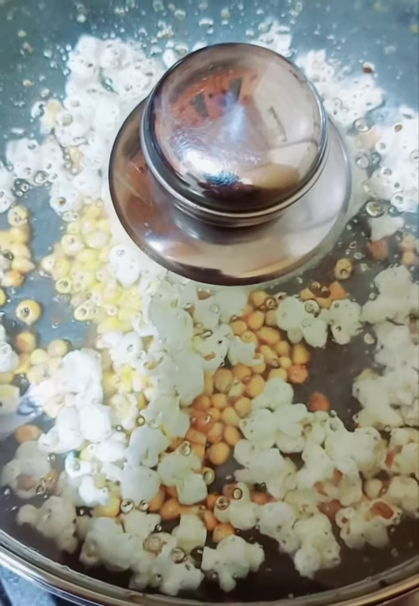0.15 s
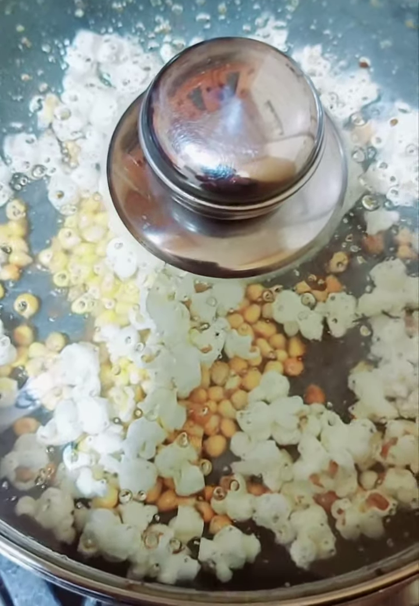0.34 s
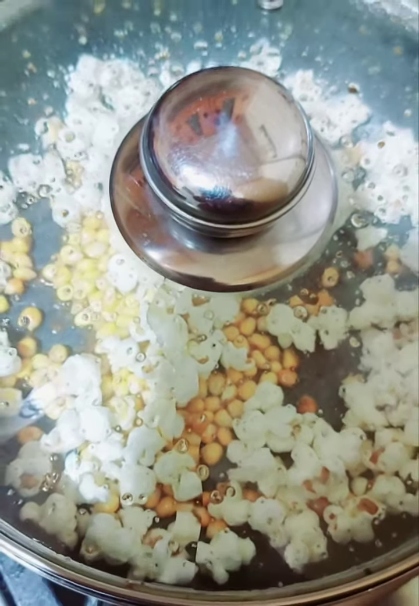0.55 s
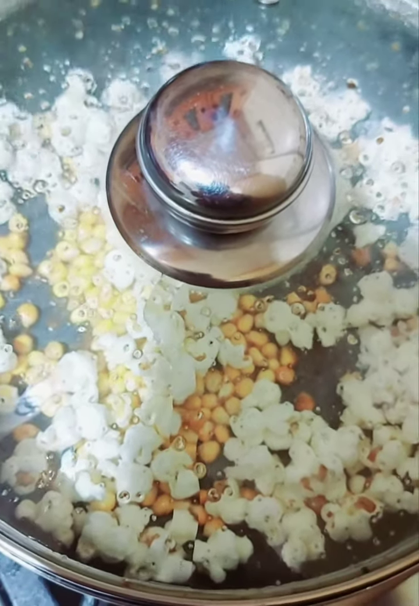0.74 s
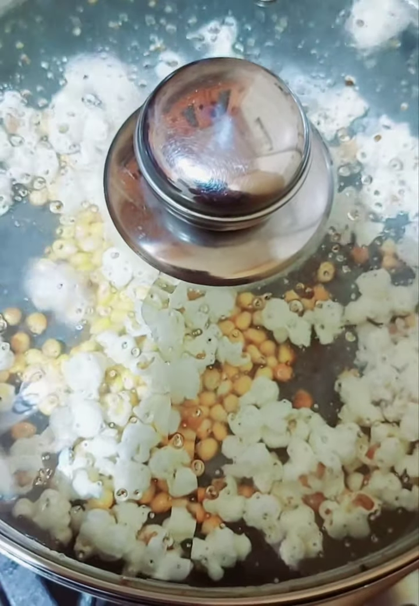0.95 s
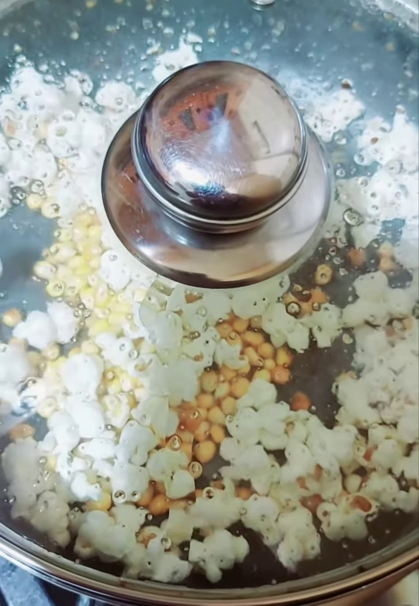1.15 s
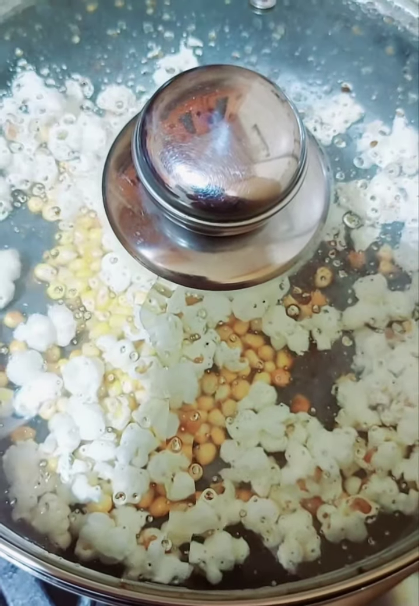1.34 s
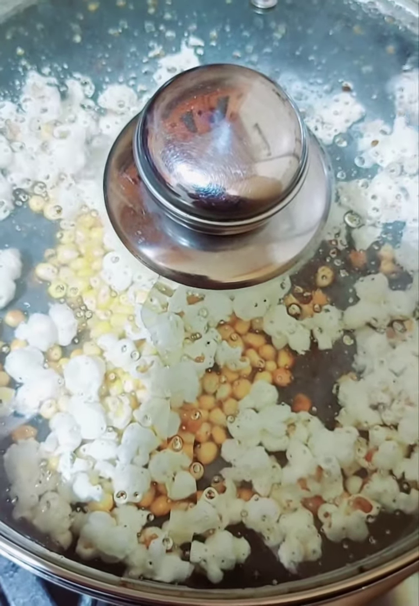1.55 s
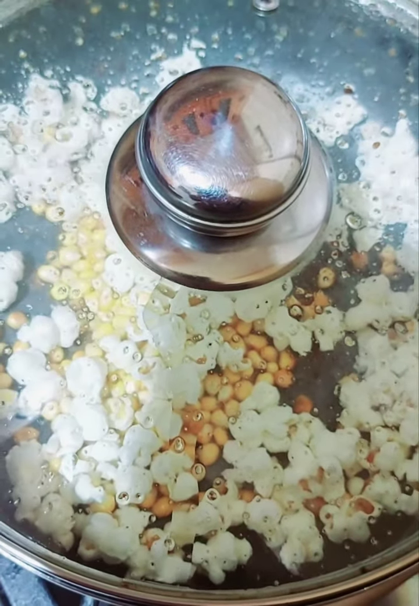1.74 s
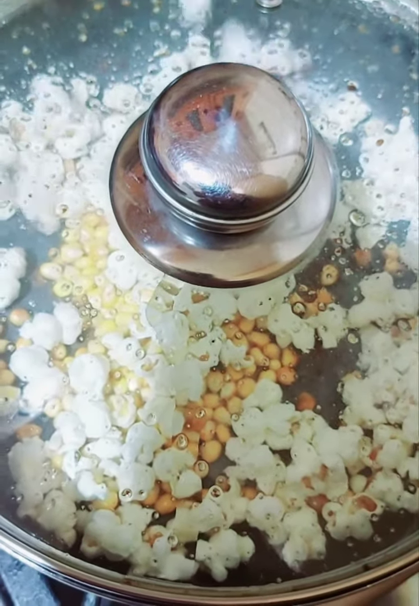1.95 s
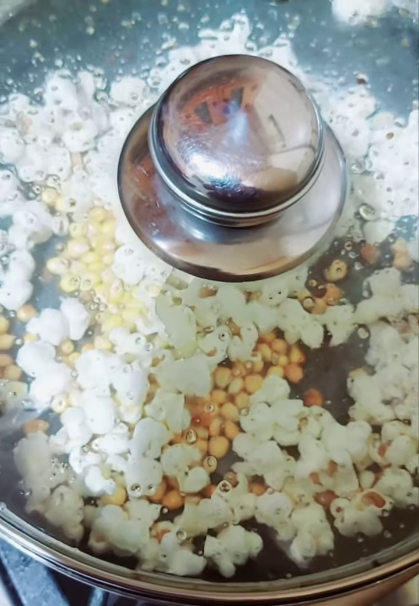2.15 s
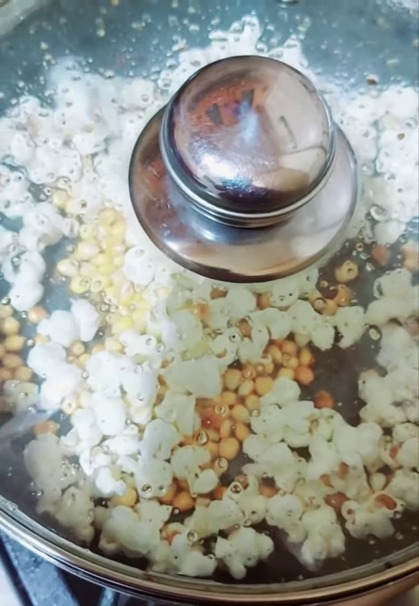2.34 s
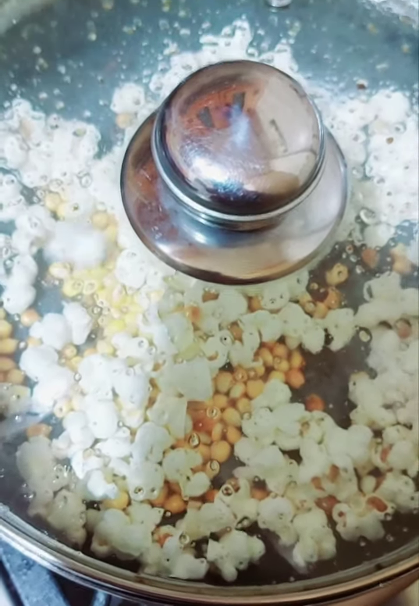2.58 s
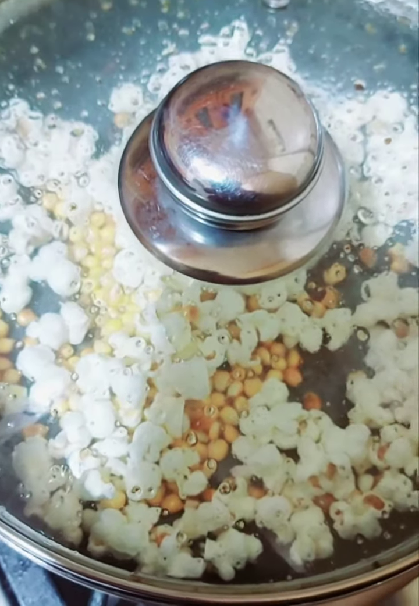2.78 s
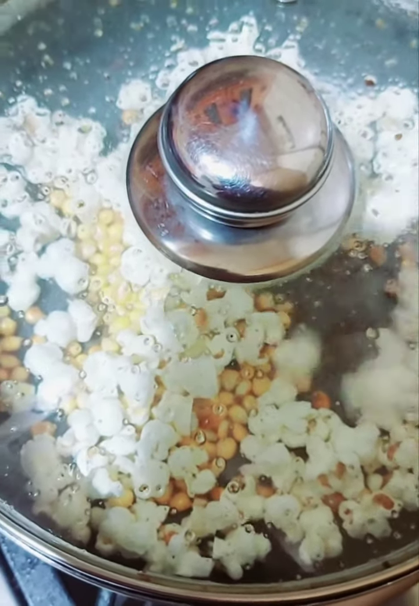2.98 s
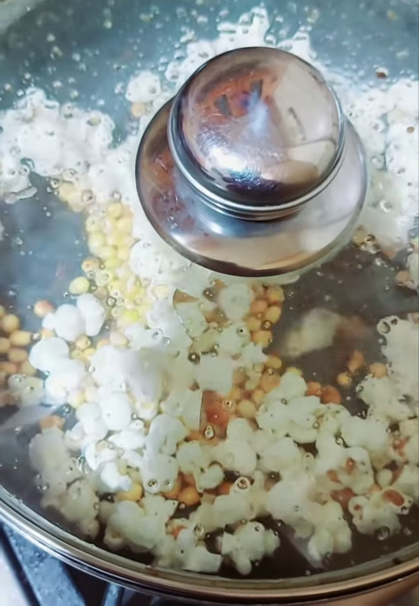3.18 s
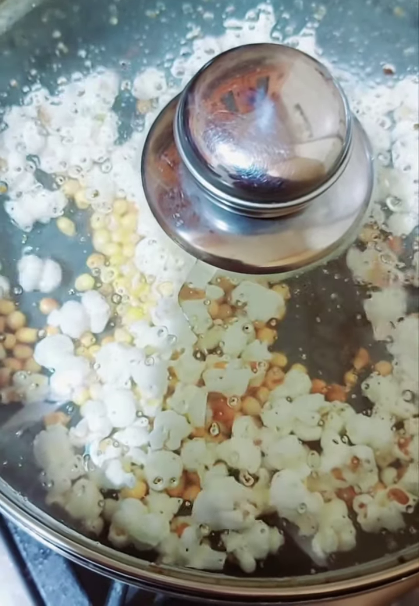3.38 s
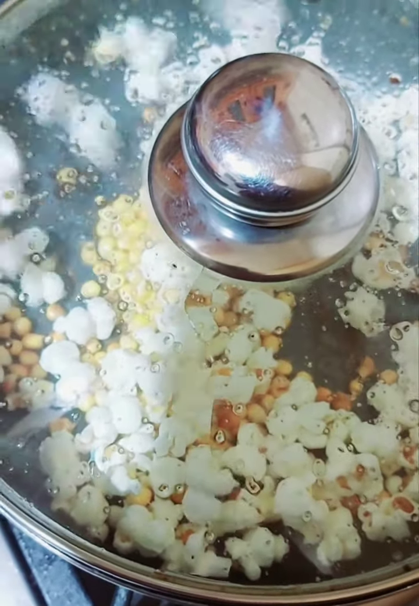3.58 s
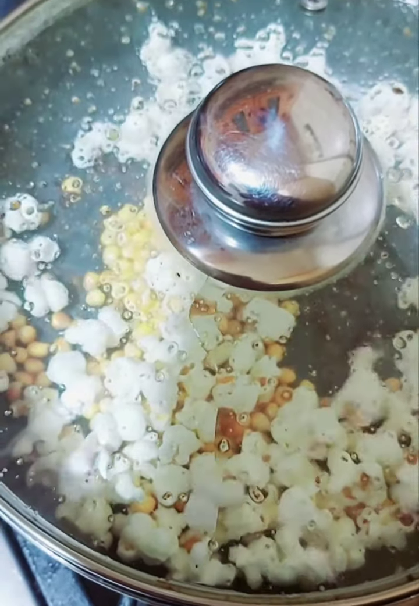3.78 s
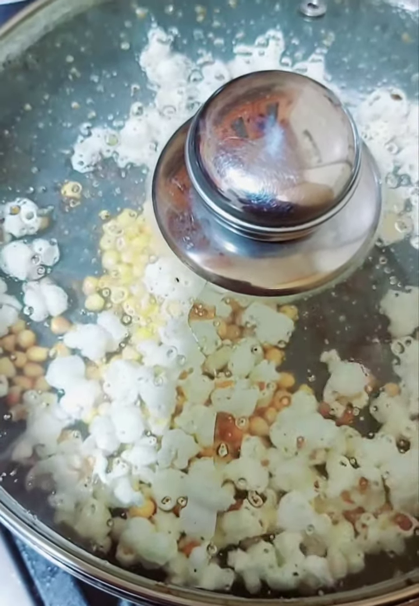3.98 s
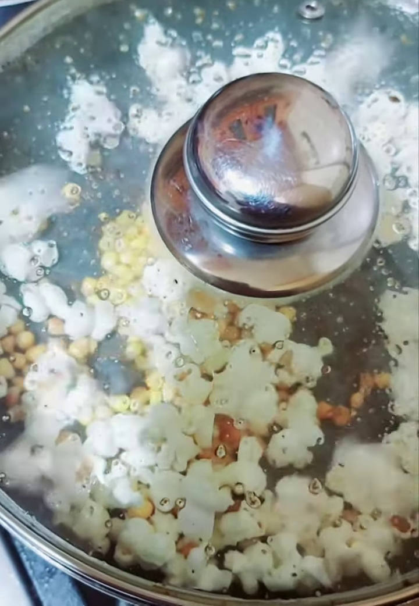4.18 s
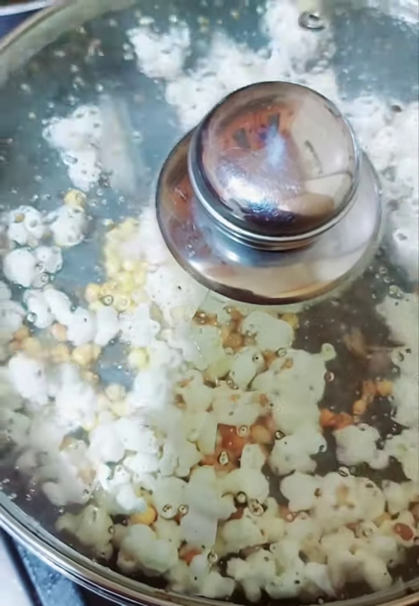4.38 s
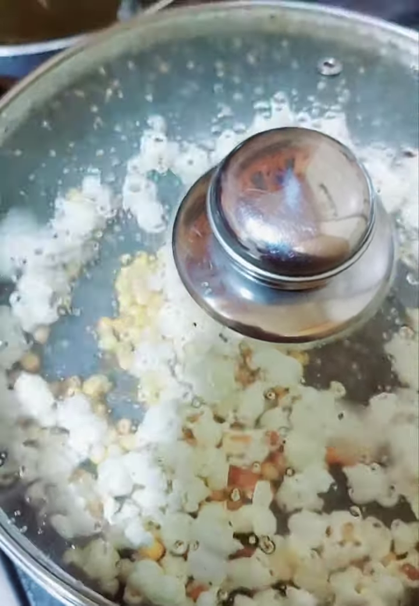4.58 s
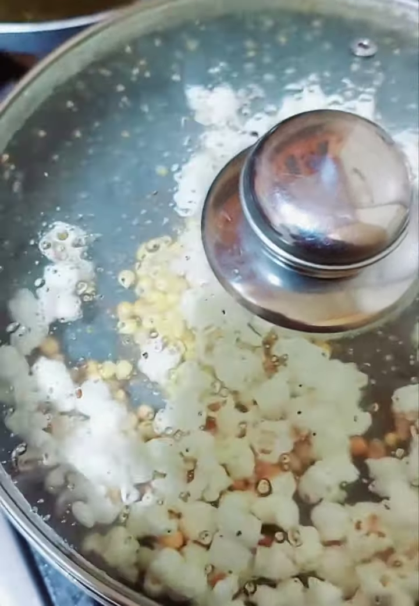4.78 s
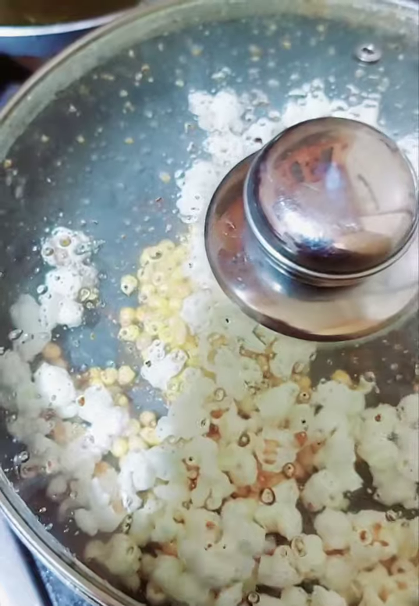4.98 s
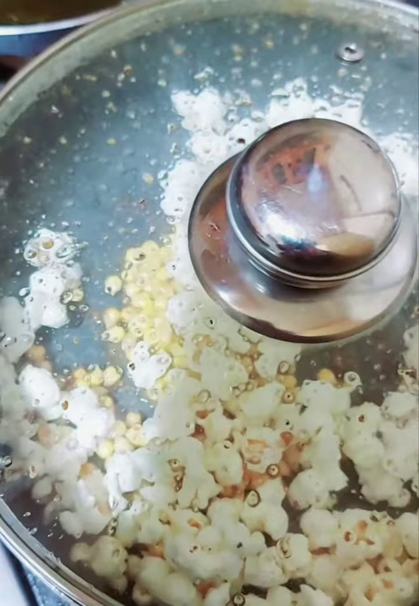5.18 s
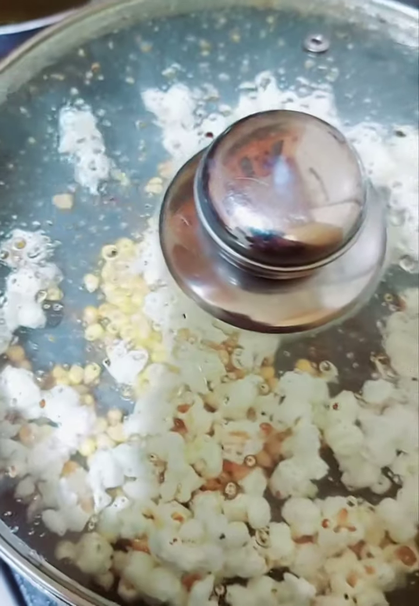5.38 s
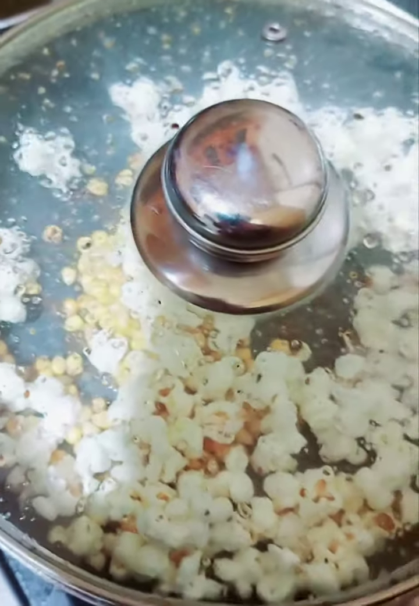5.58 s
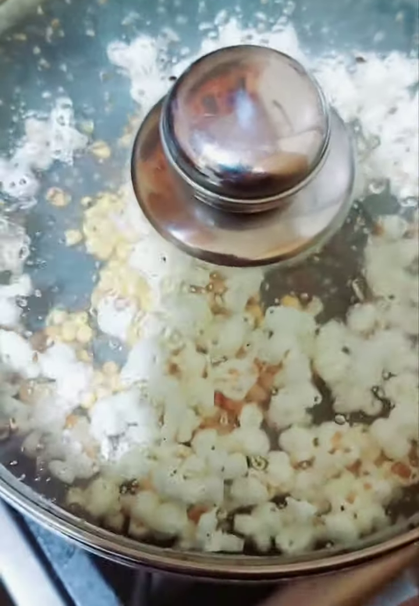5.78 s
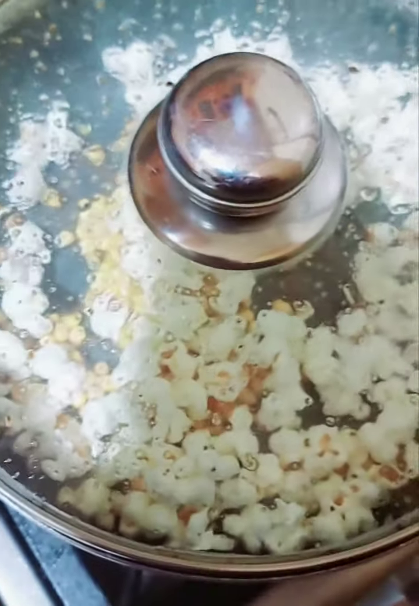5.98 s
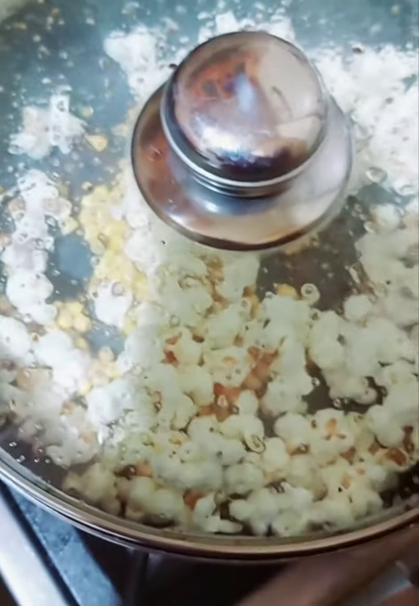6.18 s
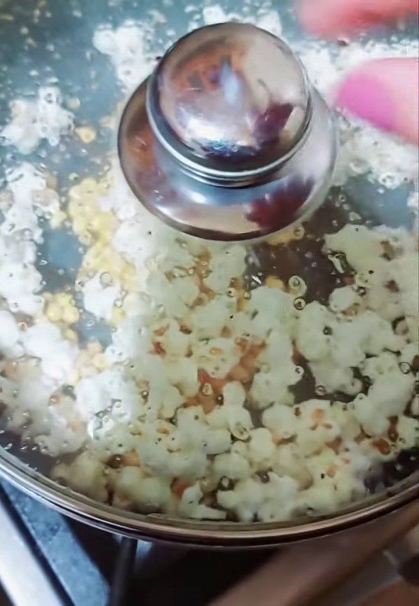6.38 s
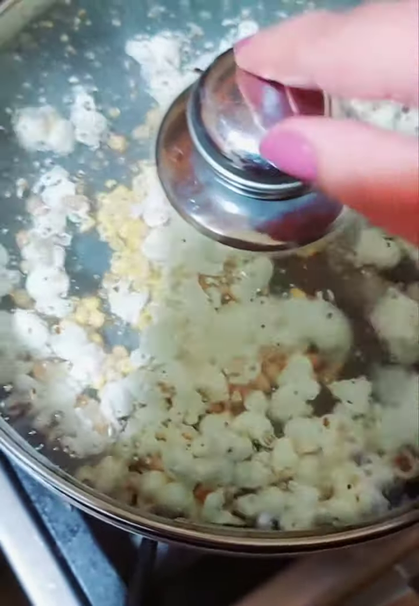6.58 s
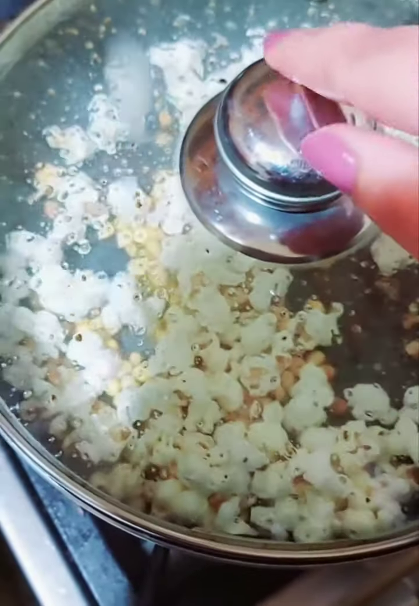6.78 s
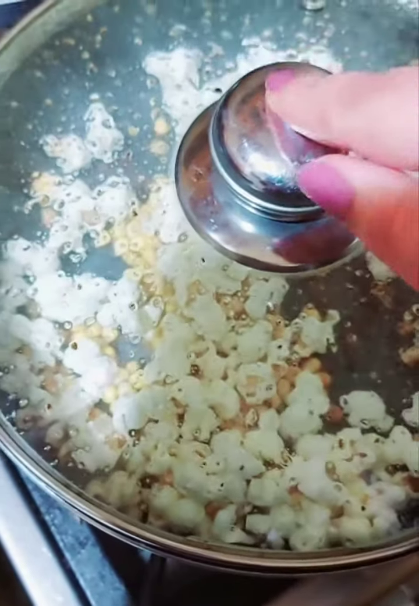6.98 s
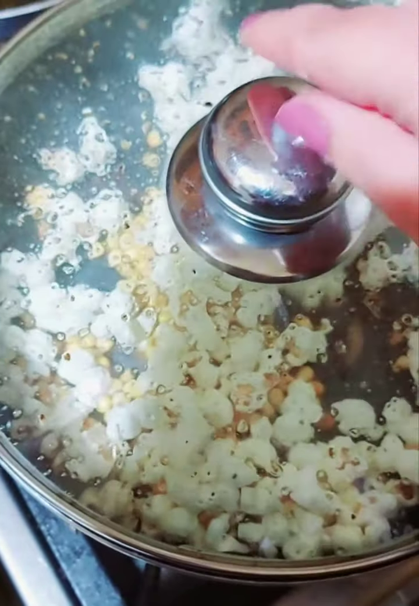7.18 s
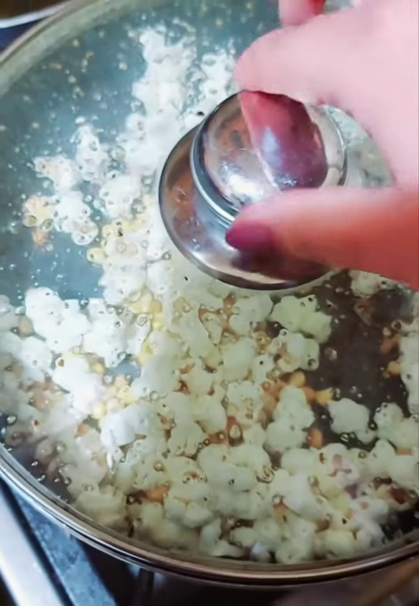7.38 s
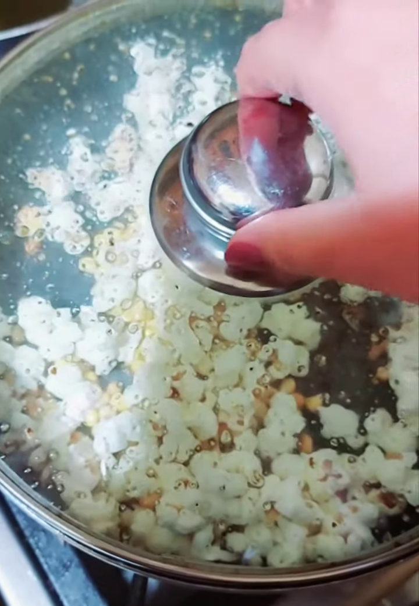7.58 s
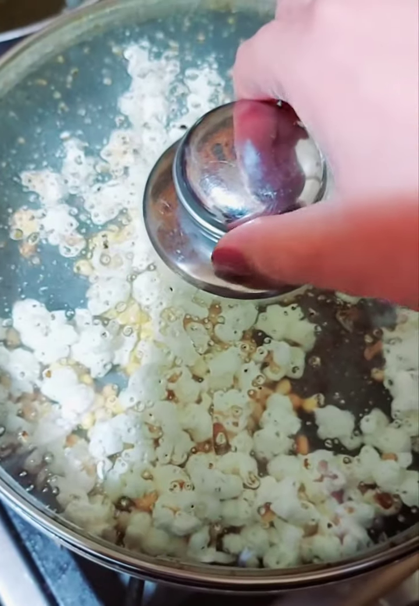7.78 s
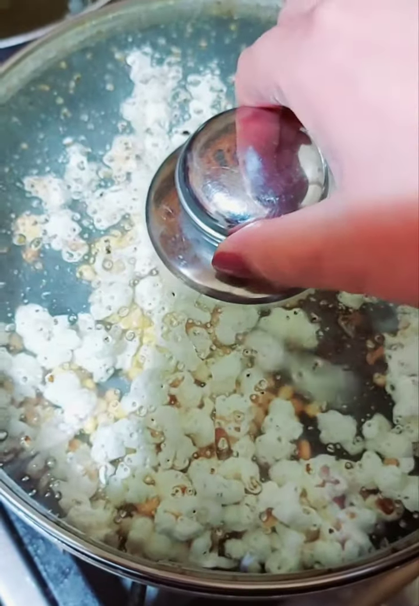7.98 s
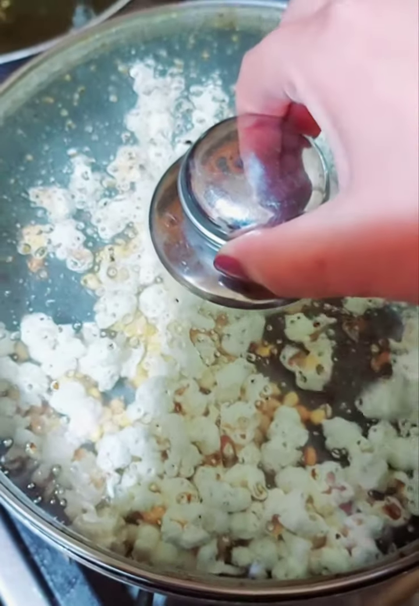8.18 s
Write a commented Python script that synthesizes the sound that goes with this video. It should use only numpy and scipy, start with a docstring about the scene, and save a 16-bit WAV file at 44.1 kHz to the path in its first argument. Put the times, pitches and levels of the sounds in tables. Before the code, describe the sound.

Heard close above a glass-lidded pan on a stove: fine oil sizzle and spitting ticks first, then popcorn kernels bursting in irregular clusters. Sharp dry cracks come with hollow low thumps, brief glass rattle and steam hiss. Flakes land with dull knocks. Popping is densest just past the middle, then thins, with two strong late pops and one final crack. Close, dry stereo.

```python
"""Popcorn kernels burst in a pan under a glass lid, heard from close above the lid by a pair of microphones.
Each burst is a noise crack, a thump and push on struck pan modes, a ring and rattle of the glass and a
noise hiss of steam. Soft flakes land with dull knocks, and hot oil spits short ticks of filtered noise.
Behind them lies a crackling noise sizzle over a low murmur; this background rises in level with each
burst, then sinks."""
import sys
import numpy as np
from scipy import signal
from scipy.fft import rfft, irfft
from scipy.io import wavfile

SR = 44100
rng = np.random.default_rng(int(sys.argv[2]) if len(sys.argv) > 2 else 0)


def store_wav(level_fs):
    """Save 16-bit WAV to argv[1]."""
    pcm = np.round(np.clip(np.atleast_2d(level_fs), -1, 1) * 32767)
    wavfile.write(sys.argv[1], SR, pcm.T.astype(np.int16))


N = 363384   # samples

# Bursting kernels: (time [s], crack level [dB], thump level [dB], glass ring level [dB],
# ring tilt [dB per octave], steam level [dB], left over right [dB])
POPS = [(0.6885, -4.5, -24, -29, 2.5, -25, 3), (0.9855, -11.5, -17, -33, 5.5, -25.5, 0),
        (1.0071, -6.5, -14.5, -53, 1, -28.5, 0), (1.0735, -4.5, -24, -30, 5, -25.5, 2),
        (1.48, -23, -25.5, -39, -3.5, -36.5, -1), (1.9482, -15.5, -24, -42, -4, -39.5, 2),
        (2.169, -21, -32.5, -39, 1.5, -37, 2), (2.4469, -19, -25, -37, -0.5, -32, 0),
        (2.4621, -19.5, -37, -40.5, -2, -55, -1), (2.5457, -37, -40, -49, -5.5, -57, 1.5),
        (3.0472, -16.5, -17.5, -34, 5.5, -30.5, 3), (3.11, -17, -33, -43, 2, -27, 1.5),
        (3.2339, -9, -32.5, -37, 6.5, -27, 1), (3.2751, -17, -32.5, -46, -6, -37, 0),
        (3.6302, -29, -38, -41.5, 1.5, -26, 0), (3.7076, -4, -25.5, -30.5, 0, -26, 2),
        (3.7335, -10.5, -33, -45.5, -12, -30, 0), (4.142, -26, -22.5, -43, 6, -34.5, 3),
        (4.1807, -18, -22, -35.5, 1, -39, 2.5), (4.2405, -7.5, -18.5, -52, -7, -27.5, 0.5),
        (4.4114, -5.5, -28, -23, 2.5, -20, 1), (4.4326, -4.5, -16.5, -24.5, 4.5, -21.5, -1),
        (4.6238, -5.5, -13, -28, 10.5, -22, 4), (4.722, -4.5, -14.5, -35, -10.5, -24.5, -1),
        (4.9579, -27, -25.5, -52, -13.5, -37.5, 1), (5.3117, -32.5, -26.5, -50, -12, -45, 0),
        (5.3316, -34, -44, -44.5, 3.5, -40.5, 0), (5.805, -22, -15, -32.5, 4.5, -30, 1),
        (6.0383, -26, -45, -55.5, 6, -50.5, 1), (6.415, -32.5, -27.5, -56.5, -12, -48, 2),
        (6.6603, -17.5, -23, -51, -6, -26.5, 2), (6.7573, -19, -55, -49.5, 5, -37, -1),
        (6.876, -21, -28, -38.5, -1.5, -37.5, -1), (7.1671, -3, -12.5, -29.5, -2, -29.5, 1),
        (7.3172, -13, -14.5, -36, 1.5, -35.5, -2), (7.4024, -27, -46, -89, -6, -60, 0),
        (8.0687, -13.5, -31, -44, -0.5, -34, 0.5)]
# Flakes landing and bumping: (time [s], knock level [dB], bump level [dB])
LANDINGS = [(0.937, -48, -47), (1.65, -47, -46), (1.982, -29.5, -37), (2.088, -38.5, -49),
            (2.313, -49, -46), (2.581, -34, -66), (2.623, -40, -45), (3.303, -25, -41),
            (3.537, -37.5, -37.5), (3.892, -38, -50.5), (4.341, -29, -35), (5.052, -32.5, -52),
            (5.108, -34.5, -55), (5.386, -30, -47), (5.452, -39.5, -65), (5.522, -52, -50.5),
            (6.536, -37.5, -36.5), (6.638, -57, -63), (6.945, -39, -41), (7.574, -59, -58.5)]
# The clearest spits of oil: (time [s], treble level [dB], middle level [dB], left over right [dB])
SPITS = [(0.174, -15, -26, 7), (0.2403, -25.5, -36, 7), (0.3129, -26, -41, 9), (0.405, -31, -48, 9),
         (0.442, -25, -49, 5), (0.544, -29.5, -41, 12), (0.845, -20, -33, 2), (0.9538, -29.5, -36, 6),
         (1.1996, -20.5, -30, 1), (2.2633, -26, -28.5, 3.5), (2.8592, -35, -41, 4), (3.168, -29, -33, 8),
         (3.1935, -19, -20, 4), (3.3765, -28, -33.5, 5), (3.454, -30.5, -46, -13),
         (3.4651, -26.5, -26.5, -12), (3.5783, -36.5, -44, 3), (4.576, -20.5, -34, 1.5),
         (4.834, -21.5, -28, 1), (5.58, -39, -53, 3), (6.207, -35.5, -49, 2.5), (6.4977, -34.5, -47, 4),
         (6.7113, -24, -22, 3), (6.8099, -28, -40, 1), (6.8422, -26.5, -33, -1), (6.9657, -26.5, -29.5, 1),
         (7.0292, -23.5, -34.5, -1), (7.302, -32.5, -40, -2), (7.6584, -39, -52.5, -7)]
# Background under the events: (time [s], sizzle level [dB], murmur level [dB])
FRYING = [(0.04, -50.5, -60.5), (0.15, -38.5, -50), (0.3, -46.5, -55.5), (0.9, -45.5, -48.5),
          (1.34, -45, -52.5), (1.75, -53.5, -69.5), (2.2, -51.5, -58.5), (2.96, -61.5, -65),
          (3.3, -48.5, -45.5), (3.6, -56.5, -61.5), (3.9, -44.5, -52), (4.9, -45.5, -47), (5.2, -57, -61),
          (6.0, -57, -69), (6.6, -58, -54.5), (6.98, -47, -52.5), (7.3, -60.5, -68.5), (8.0, -65.5, -69.5),
          (8.24, -53, -58)]

# Air under the lid and pan floor: (frequency [Hz], level [dB], t60 [s])
PAN_MODES = [(225, -27, .15), (243.4, -10.5, 0.25), (257.7, -8.5, .15), (291.1, -13.5, 0.25),
             (309.7, 5, 0.16), (307, -14, 0.14), (300, -22.5, 0.061), (410, -37, 0.22),
             (408.8, -16.5, 0.17), (548, -19, 0.027)]
# The whole pan on its support: (frequency [Hz], level [dB], t60 [s])
SUPPORT_MODES = [(103.4, 2, 0.21), (152.1, -0.5, 0.17)]
# Glass lid: (frequency [Hz], level [dB], t60 [s])
LID_MODES = [(1152, -2, .18), (1190, 0, .22), (1805, -9, .15), (1860, -1, .2), (2210, -9, .13),
             (2514, -5, .13), (2900, -11, .1), (3140, -5, .12), (3230, -5, .12), (3580, -9, .09),
             (3850, -7, .09), (4000, -7, .09), (4300, -8, .1), (4580, -9, .1), (4950, -10, .09),
             (5230, -9, .09), (5460, -10, .09), (5820, -11, .09)]

# Colour of the splitting hull: (frequency [Hz], relative density [dB per Hz])
CRACK_COLOUR = [(300, -24), (600, -5.5), (1500, -8), (3000, -1.5), (5000, 2), (8000, 1), (12000, 3.5),
                (16000, -1.5)]
# Colour of the escaping steam: (frequency [Hz], relative density [dB per Hz])
STEAM_COLOUR = [(40, -3), (100, 2), (300, 11), (500, -3), (800, -8), (1500, -8), (2500, -8.5), (4000, -7.5),
                (7000, -11.5), (12000, -6), (16000, -8.5)]
# Colour of the hot oil: (frequency [Hz], relative density [dB per Hz])
SIZZLE_COLOUR = [(760, -37), (1300, -24.5), (2490, -10), (3450, -13), (3960, -6.5), (8080, -6), (12000, 2),
                 (16000, 0)]
# Colour of the low murmur in the pan: (frequency [Hz], relative density [dB per Hz])
MURMUR_COLOUR = [(18, -55), (30, -23.5), (97, -4.5), (191, -20), (312, 3), (412, -16), (630, -15.5),
                 (730, -23), (1010, -21), (1170, -22.5), (1500, -32.5), (1950, -73.5), (3300, -120)]
# Likeness of the noise at the two microphones: (frequency [Hz], correlation [0 to 1])
LIKENESS = [(60, 0.83), (300, 0.97), (600, 0.38), (2000, 0.031), (8000, 0.02)]

# Parts of the crack, against its own level
SNAP_DB, SNAP_T60_S = -7.5, 0.005
CRACK_BODY_DB, CRACK_BODY_T60_S = -9.5, 0.031
# The low push follows thump and crack together
PUSH_DB, PUSH_FOLLOWS_THUMP = -19.5, 0.4
TILT_PIVOT_HZ = 2100
# The rattle against the glass ring; bright blows shake the lid harder
RATTLE_DB, RATTLE_T60_S, RATTLES_PER_S, RATTLE_TILT_SHARE = -0.5, 0.43, 400.0, 0.36
STEAM_T60_S = 0.31
KNOCK_T60_S, BUMP_T60_S = 0.075, 0.22
# Small spits: the loudest against the sizzle, and the middle against the treble
SMALL_SPITS_PER_S, SMALL_SPIT_DB, SMALL_SPIT_MIDDLE_DB = 9.2, 7, -17
TICK_T60_S = 0.016
# The background rises with each burst, then sinks: the hiss against the steam, the murmur against the thump
HISS_RISE_DB, HISS_RISE_T60_S = -16.5, 0.66
MURMUR_RISE_DB, MURMUR_RISE_T60_S = -21.5, 0.5
TOP_STOP_HZ = 16979

BURST_S, CRACK_DB, THUMP_DB, RING_DB, TILT_DB, STEAM_DB, POP_PAN_DB = np.transpose(POPS)


def pops():
    """Every burst cracks, moves air and pan, shakes the glass and lets off steam."""
    lid = (lid_ring() + lid_rattle()) * amp([[2.2], [-2.2]])   # stronger at the left microphone
    return crack() + thump() + push() + lid + steam()


def crack():
    """The hull splits: noise with a sharp snap and a longer body."""
    snap = envelope(BURST_S + 0.00022, CRACK_DB + SNAP_DB, SNAP_T60_S, POP_PAN_DB, rise_s=0.0004)
    body = envelope(BURST_S, CRACK_DB + CRACK_BODY_DB, CRACK_BODY_T60_S, POP_PAN_DB, rise_s=0.00094)
    return (snap + body) * stereo_noise(CRACK_COLOUR)


def thump():
    """The burst sets the air under the lid and the pan floor ringing in their low modes."""
    blow = struck(BURST_S - .0003, THUMP_DB, PAN_MODES, spread_db=3, detune=.012, width=.14, rise_s=.002)
    return blow * amp([[-.8], [.8]])   # a little stronger at the right microphone


def push():
    """The burst shoves the whole pan on its support."""
    level_db = PUSH_DB + PUSH_FOLLOWS_THUMP * THUMP_DB + (1 - PUSH_FOLLOWS_THUMP) * CRACK_DB
    return struck(BURST_S - .0008, level_db, SUPPORT_MODES, spread_db=3, detune=.01, width=.1, rise_s=.0015)


def lid_ring():
    """The blow rings the glass modes, tilted dull or bright about the pivot."""
    octaves = np.log2(np.transpose(LID_MODES)[0] / TILT_PIVOT_HZ).clip(-1, 1)
    mode_levels_db = RING_DB[:, None] + np.outer(TILT_DB, octaves)
    ring = struck(BURST_S, mode_levels_db, LID_MODES, spread_db=3.0, detune=0.0074, width=0.93, rise_s=0.00022)
    return ring * (1 + 0.55 * drift(41))   # a chance wavering in level roughens the ring


def lid_rattle():
    """A dying shower of random knocks feeds the glass modes after each burst."""
    knocks = (rng.random((2, N)) < RATTLES_PER_S / SR) * rng.standard_normal((2, N))
    level_db = RING_DB + RATTLE_DB + RATTLE_TILT_SHARE * TILT_DB
    return through_lid(envelope(BURST_S, level_db, RATTLE_T60_S, 0, rise_s=.003) * knocks)


def steam():
    """Escaping steam leaves a dying, crackling hiss, set nearer the middle than the crack."""
    fall = envelope(BURST_S, STEAM_DB, STEAM_T60_S, .5 * POP_PAN_DB, rise_s=0.00042)
    return fall * crackle(rate=140, size=.8) * stereo_noise(STEAM_COLOUR)


def landings():
    """Soft flakes land with a short dull knock and a rough low bump, both of decaying noise."""
    s, knock_db, bump_db = np.transpose(LANDINGS)
    dull = filtered(rng.standard_normal((2, N)), 1, [350, 1500], "band")
    knock = envelope(s, knock_db, KNOCK_T60_S, 0, rise_s=0.00081) * dull
    bump = envelope(s, bump_db, BUMP_T60_S, 0, rise_s=0.00049) * stereo_noise(MURMUR_COLOUR)
    return knock + bump


def spits():
    """Droplets burst as short ticks of noise, with more treble or more middle."""
    s, treble_db, middle_db, pan_db = np.vstack([SPITS, small_spits()]).T
    white = rng.standard_normal((2, N))
    bright = filtered(white, 2, 7000, "high")
    broad = filtered(white, 2, [1300, 7000], "band")
    return (envelope(s, treble_db, TICK_T60_S, pan_db, rise_s=.0005) * bright
            + envelope(s, middle_db, TICK_T60_S, pan_db, rise_s=.0005) * broad)


def small_spits():
    """Small droplets burst at chance moments and places, their level following the sizzle table."""
    when, size, side = rng.random((round(SMALL_SPITS_PER_S * N / SR), 3)).T
    when = when * (N - 1) / SR
    treble_db = np.interp(when, *np.transpose(FRYING)[:2]) + SMALL_SPIT_DB - 10 * size
    return np.transpose([when, treble_db, treble_db + SMALL_SPIT_MIDDLE_DB, 20 * side - 10])


def frying():
    """The oil sizzles above a low murmur from the pan."""
    return sizzle() + murmur()


def sizzle():
    """Hot oil crackles finely in the treble; the background hiss rises with each burst, then sinks."""
    t = np.arange(N) / SR
    s, level_db, _ = np.transpose(FRYING)
    fade_in = amp(np.interp(t, [.022, .03], [-13, 0]))   # short fade-in at the start
    hiss_rise = envelope(BURST_S, STEAM_DB + HISS_RISE_DB, HISS_RISE_T60_S, 0, rise_s=.05)
    level = np.hypot(amp(np.interp(t, s, level_db)), hiss_rise) * amp(1.2 * drift(20))
    return fade_in * level * crackle(rate=300, size=.3) * stereo_noise(SIZZLE_COLOUR)


def murmur():
    """Low noise coloured by pan and lid resonances; it also rises with each burst, then sinks."""
    t = np.arange(N) / SR
    s, _, level_db = np.transpose(FRYING)
    murmur_rise = envelope(BURST_S, THUMP_DB + MURMUR_RISE_DB, MURMUR_RISE_T60_S, 0, rise_s=.03)
    level = np.hypot(amp(np.interp(t, s, level_db)), murmur_rise) * amp(2.5 * drift(8))
    glass = amp(-24.5) * through_lid(rng.standard_normal((2, N)))
    return level * (stereo_noise(MURMUR_COLOUR) + glass)


def struck(times, levels_db, modes, spread_db, detune, width, rise_s):
    """Each blow spreads its energy over decaying modes by chance; their pitch varies a little by chance too."""
    hz, mode_db, t60 = np.transpose(modes)[:, :, None]
    out = np.zeros((2, N))
    t = np.arange(round(.85 * t60.max() * SR)) / SR
    luck = rng.standard_normal((len(times), 3, len(modes), 1))
    for s, level_db, (strength, pitch, turn) in zip(times, levels_db, luck):
        gains = amp(mode_db + spread_db * strength)
        gains = gains * np.sqrt(np.sum(amp(mode_db) ** 2) / np.sum(gains ** 2))   # keep the summed power
        falls = amp(np.reshape(level_db, (-1, 1)) - 60 * t / t60)
        decays = gains * falls * (1 - np.exp(-t / rise_s))
        phase = 2 * np.pi * hz * (1 + detune * pitch) * t
        i = round(s * SR)
        for channel, sign in enumerate([1, -1]):   # a mode reaches the two microphones with unlike phase
            blow = np.sum(decays * np.sin(phase + sign * width * turn), axis=0)
            out[channel, i:i + len(t)] += blow[:N - i]
    return out


def through_lid(noise):
    """Noise keeps the glass modes ringing roughly: one resonator for each mode."""
    out = 0
    for hz, mode_db, t60 in LID_MODES:
        r = amp(-60 / (0.84 * t60 * SR))   # dies a little sooner than the struck glass
        drive = np.sqrt(1 - r * r)
        poles = [1, -2 * r * np.cos(2 * np.pi * hz / SR), r * r]
        out = out + amp(mode_db) * signal.lfilter([drive, 0, -drive], poles, noise)
    return out


def envelope(times, levels_db, t60_s, pans_db, rise_s):
    """Stereo envelope: a quick rise and an exponential fall at every event, summed in power."""
    power = np.zeros((2, N))
    for s, level_db, pan_db in zip(times, levels_db, pans_db + np.zeros(len(times))):
        i = round(s * SR)
        t = np.arange(min(N - i, round(1.5 * t60_s * SR) + 2)) / SR
        shape = (1 - np.exp(-t / rise_s)) * amp(level_db - 60 * t / t60_s)
        power[:, i:i + len(t)] += (shape * amp([[pan_db / 2], [-pan_db / 2]])) ** 2
    return np.sqrt(power)


def crackle(rate, size):
    """Gain that jumps at random moments and falls back with a time constant of about 2 ms; rms 1."""
    grains = (rng.random(N) < rate / SR) * rng.exponential(size, N)
    gain = 1 + signal.lfilter([1], [1, -.988], grains)
    return gain / np.sqrt(np.mean(gain ** 2))


def drift(rate):
    """Chance wandering with spread 1: noise through two equal low-pass poles at rate [Hz]."""
    r = np.exp(-2 * np.pi * rate / SR)
    slow = signal.lfilter([1], [1, -2 * r, r * r], rng.standard_normal(N + SR))[SR:]
    return slow / slow.std()


def stereo_noise(spectrum):
    """Coloured noise, alike at both microphones in the bass and nearly unrelated in the treble."""
    alike = np.clip(at_hz(LIKENESS, np.fft.rfftfreq(N, 1 / SR) + 1), 0, 1)
    mid, side = rfft(rng.standard_normal((2, N)))
    pair = np.sqrt((1 + alike) / 2) * mid + np.sqrt((1 - alike) / 2) * side * [[1], [-1]]
    return coloured(irfft(pair, N), spectrum)


def coloured(x, spectrum):
    """Shape the spectrum of unit noise, keeping its rms."""
    gain = amp(at_hz(spectrum, np.fft.rfftfreq(N, 1 / SR) + 1))
    return irfft(rfft(x) * gain / np.sqrt(np.mean(gain ** 2)), N)


def filtered(x, order, edges_hz, kind):
    """Pass a band of the noise through a Butterworth filter."""
    return signal.sosfilt(signal.butter(order, edges_hz, kind, fs=SR, output="sos"), x)


def at_hz(points, hz):
    """Read a table on a log-frequency axis."""
    table_hz, values = np.transpose(points)
    return np.interp(np.log(hz), np.log(table_hz), values)


def amp(db):
    """Turn dB into gain."""
    return 10 ** (np.asarray(db) / 20)


def scene():
    """Everything in and on the pan, from the bursts back to the frying."""
    return pops() + landings() + spits() + frying()


def record(dry):
    """The lowest bass is weakened, and the top is cut steeply towards 17 kHz."""
    bass_loss = signal.butter(1, 80, "high", fs=SR, output="sos")
    top_loss = signal.cheby1(8, .5, 15700, fs=SR, output="sos")
    steep_cut = signal.cheby2(14, 50, TOP_STOP_HZ, fs=SR, output="sos")
    return signal.sosfilt(np.vstack([bass_loss, top_loss, steep_cut]), dry)


dry = scene()
out = record(dry)
store_wav(out)
```